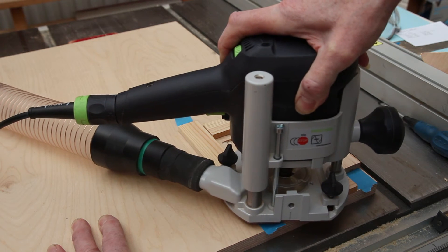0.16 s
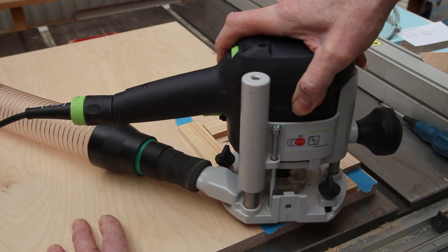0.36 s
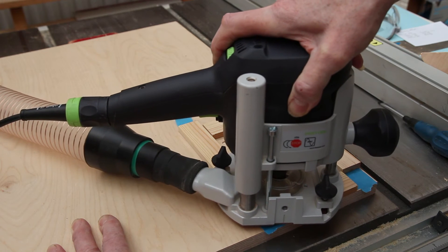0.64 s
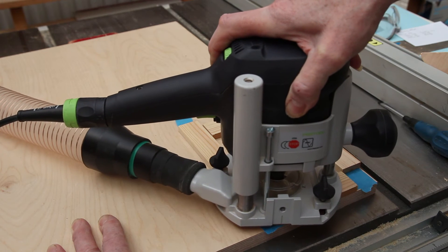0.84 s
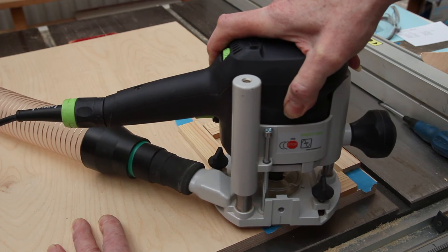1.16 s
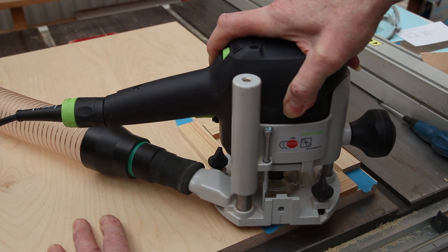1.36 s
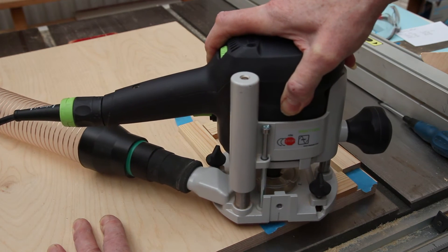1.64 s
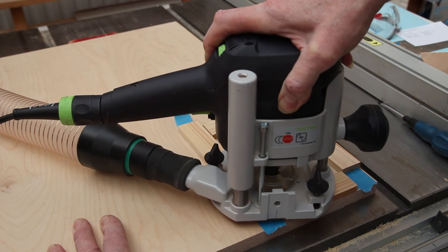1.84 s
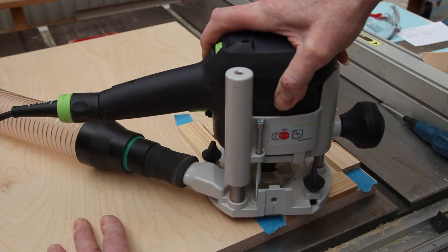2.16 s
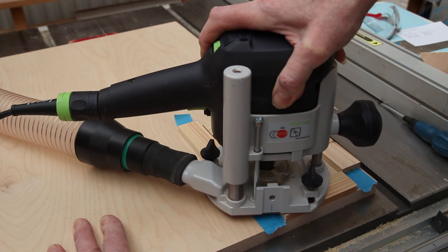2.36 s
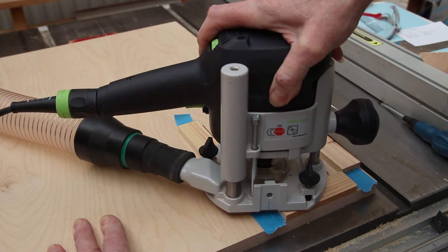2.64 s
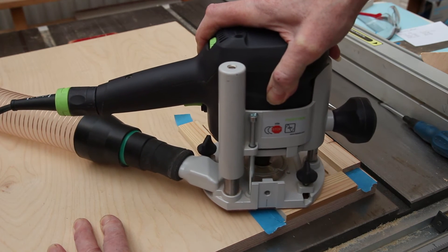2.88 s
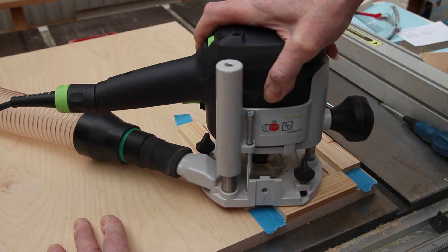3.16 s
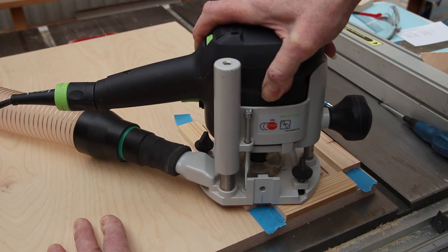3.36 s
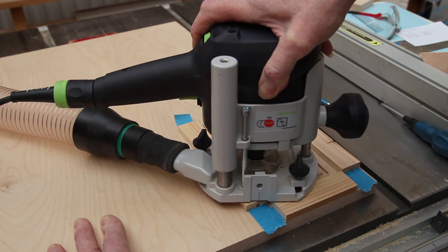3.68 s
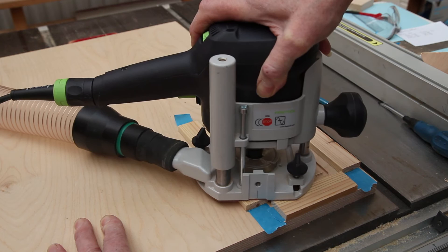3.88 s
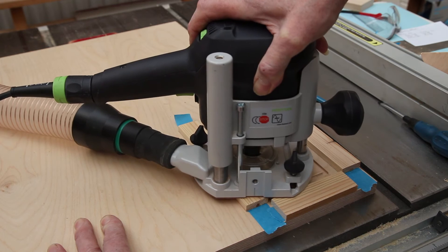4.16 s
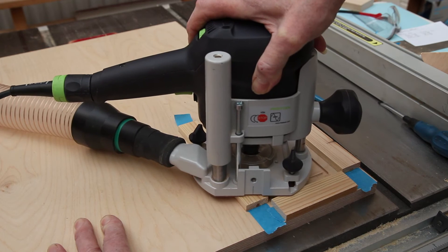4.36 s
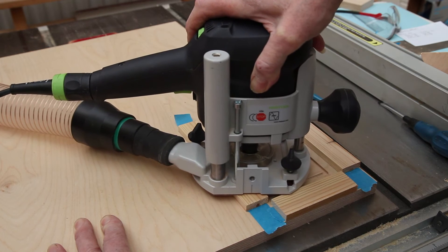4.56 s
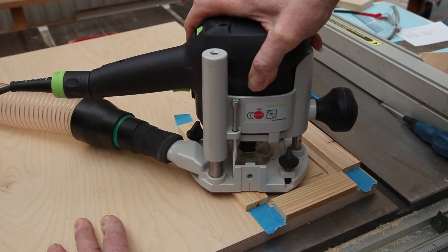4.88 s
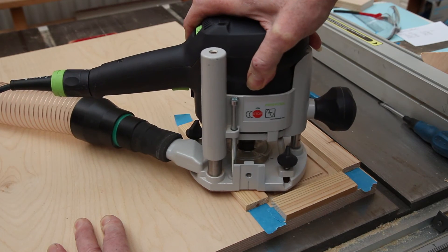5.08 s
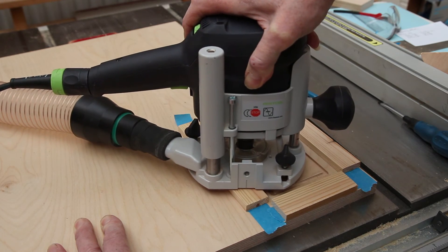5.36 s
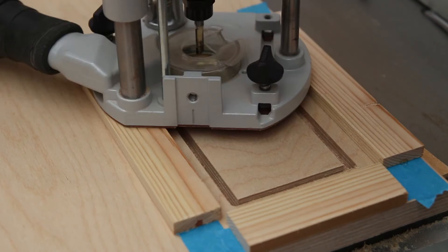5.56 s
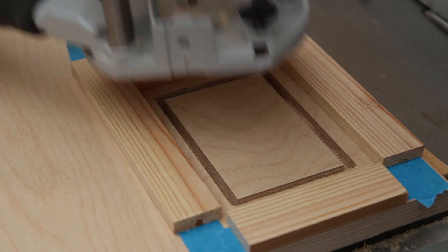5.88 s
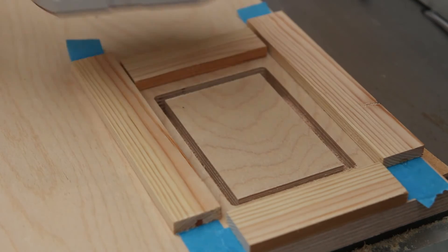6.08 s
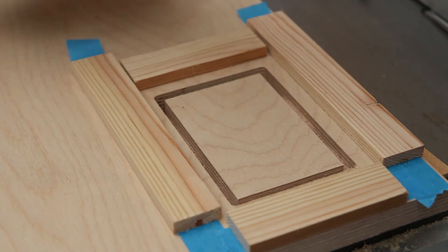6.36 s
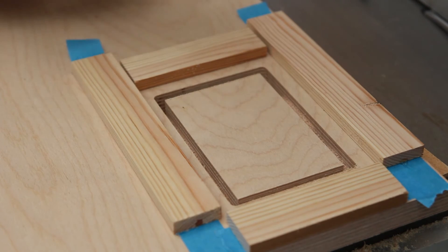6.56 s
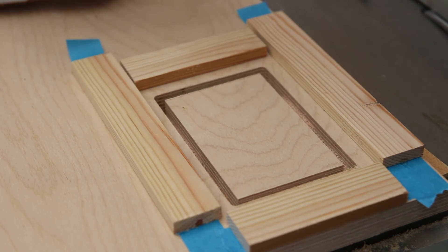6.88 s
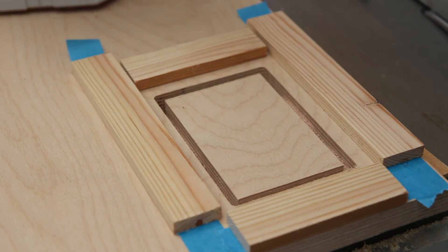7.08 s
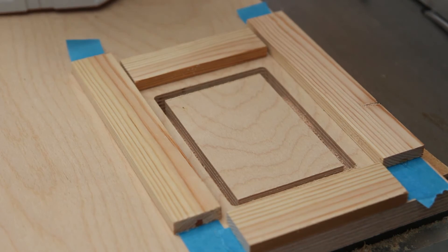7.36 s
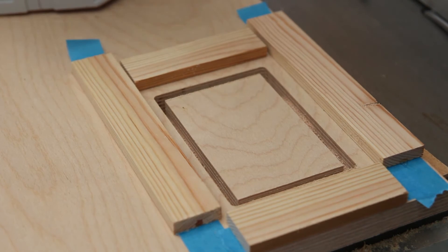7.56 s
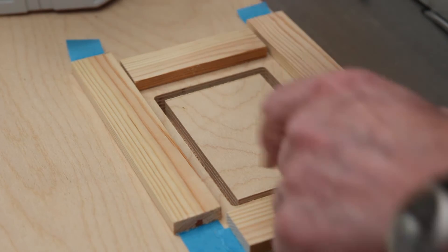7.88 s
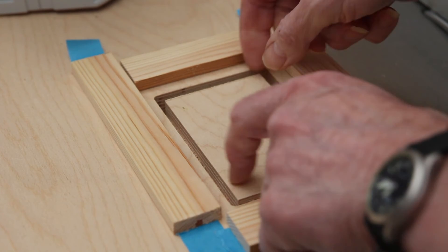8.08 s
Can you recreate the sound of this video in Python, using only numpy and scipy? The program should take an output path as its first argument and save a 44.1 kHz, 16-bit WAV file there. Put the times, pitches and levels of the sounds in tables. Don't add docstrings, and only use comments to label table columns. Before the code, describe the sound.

A router screams at close range, chattering through plywood with one brief lift and plunge, then abruptly a quiet shop with hose rattles, knocks and brushing.

```python
import sys
import numpy as np
from scipy import signal
from scipy.fft import rfft, irfft, next_fast_len
from scipy.io import wavfile
from scipy.ndimage import uniform_filter1d, map_coordinates

SR = 44100
rng = np.random.default_rng(int(sys.argv[2]) if len(sys.argv) > 2 else 0)


def store_wav(level_fs):
    pcm = np.round(np.clip(np.atleast_2d(level_fs), -1, 1) * 32767)
    wavfile.write(sys.argv[1], SR, pcm.T.astype(np.int16))


def gain_from_db(level_db):
    decades = np.asarray(level_db, float) / 20
    return 10 ** decades


N = 362943
TIME = np.arange(N) / SR
CUT_S = 5.603

# start in seconds, end in seconds.
PASSES = [
    (0.0, 1.07),
    (1.51, 5.6),
]
# frequency in Hz, left-right likeness (1 = mono).
ROUTER_ALIKE = [(60, 0.82), (180, 1), (550, 0.99), (1650, 0.99), (4970, 0.85), (15000, 0.13)]
# frequency in Hz, left-right likeness (1 = mono).
SHOP_ALIKE = [(60, 0.88), (240, 0.72), (950, 0.22), (3770, -0.049), (15000, -0.29)]


def unit(x):
    return x / np.sqrt(np.mean(x ** 2) + 1e-20)


def along(points, hz):
    f, v = np.transpose(points)
    return np.interp(np.log(hz + 1), np.log(f + 1), v)


def during(spans, fade):
    return sum(np.interp(TIME, [a - fade, a, b, b + fade], [0, 1, 1, 0]) for a, b in spans)


def hump(s, rise, fall):
    return np.exp(-.5 * ((TIME - s) / np.where(TIME < s, rise, fall)) ** 2)


def bells(rows):
    s, width, height = np.transpose(rows)[:, :, None]
    coarse = TIME[::32]
    heights = height * np.exp(-.5 * ((coarse - s) / width) ** 2)
    return np.interp(TIME, coarse, heights.sum(axis=0))


def peak(s, db, rise_db_s, fall_db_s):
    return gain_from_db(db - np.where(TIME < s, rise_db_s, fall_db_s) * abs(TIME - s))


def wobble(rate):
    knots = rng.standard_normal(2000)
    coarse = TIME[::64]
    return np.interp(TIME, coarse, map_coordinates(knots, [coarse * rate]))


def filtered(x, response):
    m = next_fast_len(N + SR // 2)
    return irfft(rfft(x, m) * response(np.fft.rfftfreq(m, 1 / SR)), m)[..., :N]


def pan(db):
    return gain_from_db(np.array([db / 2, -db / 2]))


def rush(spectrum, alike, patchy_db):
    z = signal.stft(rng.standard_normal((2, N)), nperseg=512)[2]
    field = uniform_filter1d(rng.standard_normal(z.shape[1:]), size=6, axis=0)
    field = uniform_filter1d(field, size=10, axis=1)
    pair = signal.istft(z * gain_from_db(patchy_db * unit(field)), nperseg=512)[1][:, :N]

    def colour(hz):
        angle = np.arccos(np.clip(along(alike, hz), -1, 1)) / 2
        return gain_from_db(along(spectrum, hz)) * [np.cos(angle), np.sin(angle)]

    mid, side = filtered(pair, colour)
    return unit(np.array([mid + side, mid - side]))


def lines(phases, levels_db, flutter_db, spread, loose, wander):
    out, n = np.zeros((2, N)), round(CUT_S * SR) + SR // 20
    for phase, level_db in zip(phases, levels_db):
        apart = spread * wobble(6.5)[:n]
        drift = (phase + 0.15 * wobble(40) + wander * wobble(5))[:n]
        angle = 2 * np.pi * loose * rng.random() + drift
        gain = np.sqrt(2) * gain_from_db(level_db + flutter_db * wobble(44))[:n]
        out[:, :n] += gain * np.sin([angle + apart, angle - apart])
    return out


def router():
    # centre in seconds, width in seconds, extra level in dB.
    bites = [(0.008, 0.014, 12), (0.066, 0.028, 10), (0.187, 0.036, 4.5), (0.268, 0.011, 6.0),
             (0.317, 0.0063, 10), (0.395, 0.036, 4.5), (0.46, 0.043, 4.5), (0.556, 0.022, 7.0),
             (0.652, 0.019, 7.5), (0.712, 0.0093, 4.9), (0.766, 0.024, 2), (0.846, 0.013, 1.5),
             (0.953, 0.141, 6.5), (1.53, 0.11, 7), (1.724, 0.052, 7), (1.83, 0.0091, 8), (1.921, 0.036, 11),
             (2.11, 0.013, 8), (2.176, 0.0065, 5), (2.177, 0.038, 6.5), (2.249, 0.035, 7.5),
             (2.375, 0.007, 7), (2.468, 0.025, 5), (2.575, 0.014, 8.5), (2.62, 0.0086, 6.5),
             (2.688, 0.034, 6.5), (2.721, 0.02, 3.5), (2.79, 0.02, 9.5), (2.843, 0.013, 3.5),
             (3.04, 0.01, 4.5), (3.109, 0.063, 5.5), (3.274, 0.006, 3.5), (3.3, 0.07, 3),
             (3.374, 0.01, 4.5), (3.478, 0.079, 10.5), (3.707, 0.033, 7.7), (3.762, 0.048, 4),
             (3.859, 0.007, 4.5), (3.927, 0.033, 11), (3.973, 0.006, 6), (4.022, 0.018, 7.5),
             (4.105, 0.058, 9.5), (4.216, 0.032, 6), (4.301, 0.036, 9.5), (4.401, 0.015, 7.6),
             (4.454, 0.013, 5.5), (4.491, 0.01, 6.5), (4.562, 0.022, 7), (4.609, 0.025, 8),
             (4.732, 0.051, 5.1), (4.764, 0.022, 8), (4.87, 0.023, 3.5), (4.915, 0.042, 8.5),
             (5.027, 0.052, 5.5), (5.081, 0.027, 4), (5.284, 0.13, 4.5), (5.324, 0.009, 3.8),
             (5.448, 0.035, 6), (5.521, 0.0095, 6.5), (5.576, 0.026, 9.5)]
    # centre in seconds, width in seconds, pitch sag in Hz.
    sags = [(0.041, 0.024, 55), (0.042, 0.199, 92), (0.4, 0.025, 23), (0.553, 0.13, 30), (0.667, 0.037, 33),
            (0.911, 0.038, 26), (1.004, 0.097, 29), (1.705, 0.037, 54), (1.842, 0.134, 77),
            (1.931, 0.031, 41), (2.137, 0.036, 50), (2.223, 0.056, 86), (2.432, 0.143, 37),
            (2.702, 0.02, 48), (2.795, 0.019, 46), (2.832, 0.119, 73), (3.07, 0.028, 39),
            (3.137, 0.042, 63), (3.217, 0.025, 44), (3.365, 0.044, 53), (3.506, 0.088, 82),
            (3.507, 0.012, 14), (3.698, 0.023, 45), (3.75, 0.034, 48), (3.933, 0.024, 45),
            (4.099, 0.02, 66), (4.133, 0.147, 95), (4.198, 0.02, 65), (4.272, 0.027, 88),
            (4.402, 0.032, 40), (4.6, 0.047, 74), (4.614, 0.013, 11), (4.757, 0.034, 63),
            (4.923, 0.076, 78), (5.048, 0.052, 78), (5.081, 0.023, 61), (5.311, 0.028, 37),
            (5.451, 0.034, 40), (5.463, 0.016, 26), (5.574, 0.031, 37)]
    load_db, sag_hz = bells(bites), bells(sags)
    free = 1 - during(PASSES, fade=0.038)
    plunge = hump(1.46, rise=0.14, fall=0.071)

    chatter_hz = 5190 - sag_hz
    rings_per_turn = 15.68
    free_turns_hz = 334.4 - 3 * plunge
    speed_hz = (1 - free) * chatter_hz / rings_per_turn + free * free_turns_hz
    bite = during(PASSES, fade=.02) * wobble(42)
    slowing = 1 - .0012 * bite
    turn = 2 * np.pi * np.cumsum(speed_hz * slowing) / SR
    ring = 2 * np.pi * np.cumsum(chatter_hz * slowing) / SR

    lean_db = np.interp(TIME, [2.75, 3.36], [-2.5, 0.3]) + .7 * wobble(4.7)
    cut = chatter(ring, turn, load_db, bite) + chips(turn, load_db, bite)
    machine = motor(turn, load_db, sag_hz, free, plunge) + cooling_air(turn, sag_hz, plunge)
    sound = cut * pan(lean_db) + machine * pan(np.array([-3.]))
    return sound * np.interp(TIME, [CUT_S - .002, CUT_S + 0.00074, CUT_S + 0.0032], [1, .1, 0])


def chatter(ring, turn, load_db, bite):
    # distance in turns, level in dB.
    sidebands = [(-13, -27), (-12, -22), (-6, -24), (-5, -14), (-4, -11), (-3, -12), (-2, -8), (-1, -3.5),
                 (0, .5), (1, -8.5), (2, -11), (3, -11), (4, -16), (5, -18), (6, -22), (7, -23), (8, -21),
                 (9, -22), (10, -28)]
    # distance in turns, level in dB.
    octave_bands = [(-3, -29), (-2, -25), (-1, -23), (0, -23), (1, -28), (2, -32), (3, -35), (13, -40),
                    (14, -38), (15, -40)]
    # centre in seconds, width in seconds, loss in dB.
    dips = [(0.038, 0.0073, 3.5), (0.126, 0.0048, 2), (0.148, 0.0024, 2.8), (0.216, 0.0034, 6),
            (0.293, 0.0086, 3), (0.355, 0.0117, 3.0), (0.435, 0.0044, 4), (0.489, 0.0035, 5),
            (0.515, 0.0067, 3), (0.601, 0.0096, 5), (0.692, 0.009, 2), (0.878, 0.0038, 5.2),
            (0.94, 0.0064, 5.4), (1.04, 0.0035, 2.8), (1.642, 0.012, 2), (1.694, 0.0069, 3.7),
            (1.798, 0.0109, 3), (1.85, 0.012, 3.1), (1.906, 0.0045, 2.8), (2.001, 0.0094, 3.0),
            (2.075, 0.011, 4.5), (2.157, 0.006, 2), (2.347, 0.0066, 8.6), (2.405, 0.013, 4),
            (2.598, 0.0073, 3), (2.642, 0.0076, 3), (2.756, 0.0093, 3), (2.861, 0.003, 3.4),
            (2.887, 0.0054, 2), (3.067, 0.0059, 6.7), (3.217, 0.012, 1), (3.257, 0.0037, 6),
            (3.293, 0.0085, 3.5), (3.336, 0.0068, 3), (3.404, 0.0101, 3.1), (3.454, 0.01, 2.7),
            (3.6, 0.0044, 8), (3.648, 0.0097, 2), (3.751, 0.0054, 5), (3.819, 0.0086, 3),
            (3.993, 0.0074, 4.5), (4.053, 0.0044, 7), (4.085, 0.0038, 6), (4.18, 0.0057, 3),
            (4.276, 0.0063, 4), (4.344, 0.0046, 6), (4.366, 0.0044, 2.8), (4.428, 0.0049, 3),
            (4.514, 0.0081, 6.0), (4.647, 0.0046, 5.2), (4.669, 0.0029, 4.2), (4.821, 0.012, 3),
            (5.09, 0.0033, 8), (5.116, 0.0044, 3.8), (5.148, 0.0037, 6), (5.258, 0.0057, 4),
            (5.294, 0.0049, 3.0), (5.348, 0.0065, 4.8), (5.498, 0.0078, 5.2), (5.549, 0.0078, 3.4)]
    dip_db = bells(dips)
    swell_db = load_db - dip_db
    beads_db = 1.2 * np.minimum(bite, .4)
    light_cut_db = -25.5
    cutting = during(PASSES, fade=0.0083) * gain_from_db(light_cut_db + load_db + beads_db - dip_db)

    def eased(k):
        return -min(0.17 * abs(k), .5) * swell_db

    near = lines([ring + round(k) * turn for k, _ in sidebands],
                 [db - 3.0 + eased(k) for k, db in sidebands],
                 flutter_db=2.0, spread=0.45, loose=.25, wander=1.15)
    octave_db = 3 - 0.19 * TIME + eased(4)
    octave = lines([2 * ring + round(k) * turn for k, _ in octave_bands],
                   [db + octave_db for _, db in octave_bands],
                   flutter_db=1.6, spread=0.5, loose=.25, wander=1.1)
    whine = cutting * (near + octave)
    return whine + gain_from_db(-14) * shop(whine.mean(axis=0), liveliness=.4)


def motor(turn, load_db, sag_hz, free, plunge):
    # multiple of the spindle speed, level in dB.
    motor_orders = [(2, -48), (3, -42), (5, -39), (6, -39), (8, -39.5), (12, -39.5), (15, -36.5), (16, -37),
                    (17, -48.5), (20, -50.5), (22, -49.5), (24, -51), (26, -62)]
    # multiple of the spindle speed, level in dB.
    plunge_orders = [(11, -45), (13, -46), (14, -41), (17, -44), (18, -42)]
    first_db = -42.5 + 0.041 * sag_hz - 0.97 * TIME + 7.5 * free + 0.6 * wobble(11.0)
    fourth_db = -44.5 + 0.69 * load_db + 0.028 * sag_hz + 1.15 * TIME
    fourth_db += 9 * plunge + 1.2 * wobble(12)
    orders = lines([round(k) * turn for k, _ in motor_orders],
                   [db - 4.5 + 5 * plunge for _, db in motor_orders],
                   flutter_db=2.0, spread=0.45, loose=0.97, wander=0)
    orders += lines([turn, 4 * turn], [first_db - .6, fourth_db - 1.5],
                    flutter_db=2.0, spread=0.13, loose=1, wander=0)
    woken = lines([k * turn for k, _ in plunge_orders], [db for _, db in plunge_orders],
                  flutter_db=3.0, spread=0.49, loose=1, wander=0)
    return orders + plunge * woken


def cooling_air(turn, sag_hz, plunge):
    # frequency in Hz, level in dB.
    air_colour = [(30, -86.5), (70, -39), (140, -20.5), (330, -16), (700, -11.5), (850, -10.5), (950, -3),
                  (1360, -6), (1860, -6), (3400, -8.5), (4780, -12.5), (6370, -14.5), (11900, -28.5),
                  (15500, -52)]
    roar_db = -30.5 + 8 * plunge - 0.0099 * sag_hz + 0.78 * wobble(4.08)
    roar = gain_from_db(roar_db + 3.0 + 0.54 * wobble(11)) * (1 + 0.15 * np.cos(turn))
    roar = roar * rush(air_colour, ROUTER_ALIKE, patchy_db=0.85)
    dull = 0.37 * hump(PASSES[0][1] + 0.088, .05, 0.15)
    return roar - dull * filtered(roar, lambda hz: 1 / (1 + (3800 / (hz + 1)) ** 6))


def chips(turn, load_db, bite):
    # frequency in Hz, level in dB.
    chip_colour = [(1500, -28), (2800, -11.5), (4300, -12), (5100, -12), (6400, -13), (8000, -15),
                   (10300, -17), (12000, -23.5), (13800, -29), (15000, -25), (15600, -30.5)]
    lifted = hump(PASSES[0][1] + 0.038, rise=.03, fall=0.29)
    hiss_db = -38 + 0.065 * load_db - 11.5 * lifted + 0.32 * wobble(5.8)
    edge = 1 + .5 * np.cos(turn)
    return gain_from_db(hiss_db + 6.5 + 0.27 * bite) * edge * rush(chip_colour, ROUTER_ALIKE, patchy_db=2.5)


def hose_ribs():
    # start in seconds, peak level in dB, boom in dB, crack in dB.
    ribs = [(6.148, -27.5, -14, -37), (6.184, -23, -10.5, -27), (6.225, -20.5, -19, -28),
            (6.256, -21.5, -12, -24), (6.288, -19.5, -14, -22), (6.315, -18.5, -16, -29.5),
            (6.341, -21, -10, -23), (6.401, -22.5, -7.5, -30.5), (6.471, -20.5, -13.5, -23),
            (6.639, -26, -9, -29), (6.713, -27.5, -8.5, -37), (6.869, -31, -9, -37)]
    # frequency in Hz, level in dB.
    hose_colour = [(120, -50), (300, -4), (600, -5), (760, 4), (950, -2.5), (1300, -3), (1570, 6.5),
                   (1850, -2.5), (2400, -1.5), (3000, -4.5), (4200, -12), (5000, -23.5), (8000, -60.5)]
    rib_boom_hz = 189
    return knocks([(*rib, rib_boom_hz) for rib in ribs], hose_colour,
                  ring_t60=0.043, boom_db=10.5, boom_life=0.41, focus_db=28.5)


def bench_blows():
    # start in seconds, peak level in dB, boom in dB, crack in dB, boom centre in Hz.
    blows = [(5.727, -28.5, -4.5, -40, 320), (5.735, -37, -8, -31.5, 230), (6.93, -21, -8.5, -46, 296),
             (6.938, -31.5, 1.5, -40, 136), (7.15, -19, -5.5, -36, 308), (7.161, -15, -4, -32, 93),
             (7.255, -39.5, 7, -25, 80), (7.379, -50, -4, -17, 100), (7.536, -38, 7, -24, 201)]
    # frequency in Hz, level in dB.
    board_colour = [(120, -40.5), (300, -3.5), (520, 1), (680, -7), (900, 0.5), (1100, -1.5), (1350, 0.5),
                    (1800, -14.5), (2400, -15.5), (3800, -30.5), (5000, -34), (8000, -61.5)]
    return knocks(blows, board_colour, ring_t60=0.067, boom_db=4.5, boom_life=0.77, focus_db=15.5)


def knocks(rows, body, ring_t60, boom_db, boom_life, focus_db):
    # frequency in Hz, level in dB, t60 in seconds.
    bench_modes = [(76.4, -2, 0.47), (101.4, -5, 0.65), (138, -4, 0.5), (169, -2.5, 0.37), (230, 1, 0.3),
                   (315.3, 4, 0.19), (406, -3.5, 0.32)]
    # frequency in Hz, level under the blow in dB, t60 in seconds.
    frame_modes = [(797, -29, 0.34), (920, -22, 0.21), (996, -26, 0.086), (1077, -20, .18),
                   (1190, -23.5, 0.15), (535, -24, 0.15), (1335, -29, .15), (2260, -34, .15)]
    out, t = np.zeros(N + SR), np.arange(SR // 2) / SR
    f = np.fft.rfftfreq(len(t), 1 / SR)
    body_gain = gain_from_db(along(body, f))
    crack_colour = [(2000, -60), (3500, -33), (4800, -2), (7500, -10), (11000, -18.5), (15000, -61)]
    crack_gain = gain_from_db(along(crack_colour, f))
    snap = np.roll(irfft(body_gain, len(t)), 30)
    snap = 2.2 * snap / snap.max() * gain_from_db(-60 * t / .008)
    for s, db, low_db, crack_db, boom_hz in rows:
        a, b, c = rng.standard_normal((3, len(t)))
        burst = unit(irfft(rfft(a) * body_gain, len(t)))
        burst *= 0.35 * gain_from_db(-60 * t / ring_t60) + 0.5 * gain_from_db(-60 * t / 0.0067)
        crack = unit(irfft(rfft(b) * crack_gain, len(t))) * gain_from_db(crack_db - 60 * t / 0.041)
        boom = np.zeros(len(t))
        for k, (hz, g, t60) in enumerate(bench_modes):
            mode_db = g - focus_db * abs(np.log2(hz / boom_hz)) + 2.0 * c[k]
            mode_gain = gain_from_db(mode_db - 60 * t / (t60 * boom_life))
            boom += mode_gain * np.sin(2 * np.pi * hz * (1 + 0.019 * b[k]) * t)
        boom *= gain_from_db(low_db + boom_db) * (1 - np.exp(-t / 0.0028))
        for k, (hz, g, t60) in enumerate(frame_modes):
            mode_gain = gain_from_db(g + 2.3 * a[k] - 60 * t / t60)
            boom += mode_gain * np.sin(2 * np.pi * hz * t + np.cumsum(c) / 22)
        touch = (burst + snap + crack) * (1 - np.exp(-t / 0.0004))
        out[round(s * SR):][:len(t)] += gain_from_db(db) * (touch + boom)
    return out[:N]


def ticks():
    # start in seconds, peak level in dB, centre in Hz.
    plastic_ticks = [(5.638, -39.5, 6640), (5.837, -46, 3265), (5.889, -33, 4150), (6.173, -39, 5500),
                     (6.931, -57, 5600), (7.536, -41, 1900), (7.697, -36, 504), (7.912, -49, 4000)]
    out, t = np.zeros(N + SR), np.arange(SR // 20) / SR
    for s, db, hz in plastic_ticks:
        noise = rng.standard_normal(len(t)) * gain_from_db(-60 * t / 0.019)
        band = signal.butter(2, [hz / 1.43, hz * 1.23], 'band', fs=SR, output='sos')
        out[round(s * SR):][:len(t)] += gain_from_db(db + 8.5) * signal.sosfilt(band, noise)
    return out[:N]


def brushing():
    # peak in seconds, length in seconds, scrape in dB, cloth over it in dB, fine hiss over it in dB.
    strokes = [(6.045, 0.067, -52, -5, -22), (6.115, 0.18, -49.5, -15, -30.5), (6.28, 0.43, -42, -8.5, -21),
               (7.467, 0.07, -61, 9, -18.5), (7.555, 0.083, -52, -18, -23), (7.626, 0.16, -45.5, -3.5, -5),
               (7.913, 0.21, -53, -3, -16), (8.144, .06, -55, -4, -16), (8.196, 0.11, -51.5, -13, -20)]
    rise_over_fall, drop_db = 0.51, 16.5
    shapes = np.array([peak(s, db, drop_db / (long * rise_over_fall), drop_db / long)
                       for s, long, db, _, _ in strokes])
    cloth, fine = gain_from_db(np.array(strokes)[:, 3:].T) @ shapes
    scrape_colour = [(150, -28), (350, 2.5), (900, -6.5), (1500, -2.5), (1850, -6.0), (2300, -2.5),
                     (3300, -15), (6000, -47)]
    cloth_colour = [(2000, -30), (3300, -1), (4600, -2), (5800, -1), (7000, -7), (9500, -30)]
    fine_colour = [(6000, -27), (8500, -2), (10500, 2), (13500, -13), (15500, -19.5)]
    low = shapes.sum(axis=0) * rush(scrape_colour, SHOP_ALIKE, patchy_db=4.5)
    mid = cloth * rush(cloth_colour, SHOP_ALIKE, patchy_db=2)
    high = fine * rush(fine_colour, SHOP_ALIKE, patchy_db=-2.0)
    return gain_from_db(1.4 * wobble(66)) * (low + mid + high)


def sliding():
    # frequency in Hz, width in Hz, level in dB.
    strip_modes = [(1460, 85, 1), (1900, 60, 0.5), (2340, 45, 1), (2890, 97, -16), (3860, 60, -10.5),
                   (5630, 70, -10), (6100, 80, -12), (8100, 120, -20), (10000, 150, -20)]
    # peak in seconds, rise in seconds, fall in seconds, level in dB.
    drags = [(7.538, .012, .07, -49), (7.58, .03, .04, -50.5), (7.61, 0.034, .06, -45),
             (8.19, .03, .08, -58.5)]
    grit = rng.standard_normal((2, N)) * gain_from_db(3 * wobble(90))

    def resonances(f):
        return sum(gain_from_db(db) * 1j * f * w / (c * c - f * f + 1j * f * w) for c, w, db in strip_modes)

    sung = unit(filtered(grit[0] + .3 * grit, resonances))
    u = (TIME - 8.1587) / 0.00024
    tap = gain_from_db(-29) * (.5 * u ** 2 - 1) * np.exp(-.5 * u ** 2)
    return sum(peak(s, db, 20 / rise, 20 / fall) for s, rise, fall, db in drags) * sung + tap


def shop_floor():
    # frequency in Hz, level in dB per Hz.
    quiet_colour = [(25, -30), (50, -10), (96, -5.5), (160, 0), (400, -10), (750, -11.5), (1270, -16.5),
                    (4040, -23.5), (8800, -30), (13000, -36.5), (15600, -37)]
    # peak in seconds, level in dB.
    shakes = [(6.34, -54.5), (6.48, -58.5), (7.17, -43.5), (7.56, -42.5), (7.98, -53.5)]
    quiet = gain_from_db(-50 + .8 * wobble(4)) * rush(quiet_colour, SHOP_ALIKE, patchy_db=1.0)
    still_db = -66
    shaking = gain_from_db(still_db) + sum(peak(s, db, rise_db_s=201, fall_db_s=57) for s, db in shakes)
    rumble = rush([(35, -31), (60, 10.5), (80, 18.0), (110, -42.0)], SHOP_ALIKE, patchy_db=-0.5)
    return (quiet + shaking * rumble) * (TIME > CUT_S)


def shop(x, liveliness):
    # frequency in Hz, t60 in seconds.
    room_t60 = [(150, 1), (1000, 0.29), (4000, 1), (12000, 0.26)]
    hz, t, z = signal.stft(rng.standard_normal((2, SR // 2)), SR, nperseg=256)
    decay = gain_from_db(-60 * t / along(room_t60, hz)[:, None] / liveliness)
    tail = signal.istft(z * decay, SR, nperseg=256)[1]
    tail[1] = 1.5 * tail[0] + 0.75 * tail[1]
    delayed = np.pad(x, (200, 0))[None]
    return signal.fftconvolve(delayed, tail / np.linalg.norm(tail[0]), axes=1)[:, :N]


def scene():
    ribs, blows, small = hose_ribs(), bench_blows(), ticks()
    hits = ribs * pan(np.array([-2.])) + blows * pan(np.array([-3.])) + small
    room = gain_from_db(-6.0) * shop(ribs, liveliness=0.31)
    room += gain_from_db(-12) * shop(small, liveliness=0.6)
    room += gain_from_db(-11.0) * shop(blows, liveliness=0.6)
    rubbing = brushing() + sliding()
    return router() + hits + room + (rubbing + shop_floor()) * pan(np.array([-2.8]))


def band_limit(x):
    return signal.sosfilt(signal.butter(12, 15640, fs=SR, output="sos"), x)


def record(dry):
    heard = filtered(dry, lambda hz: (1j * hz / (48 + 1j * hz)) ** 2 * 1j * hz / (60 + 1j * hz))
    return band_limit(heard)


dry = scene()
out = record(dry)
store_wav(out)
```